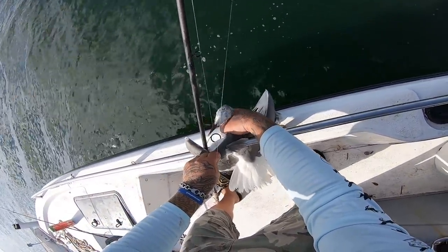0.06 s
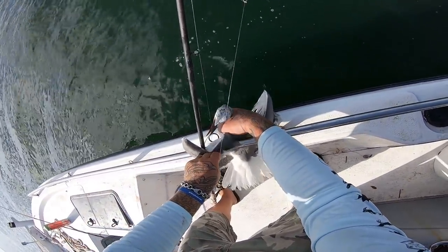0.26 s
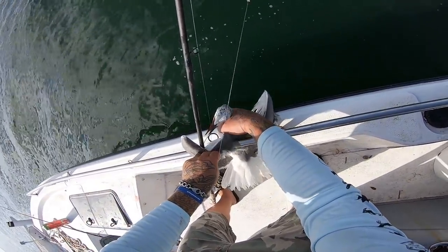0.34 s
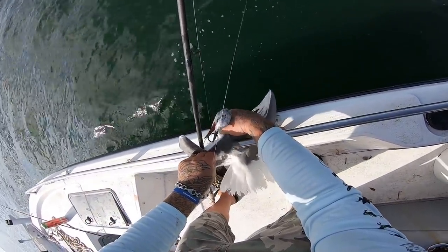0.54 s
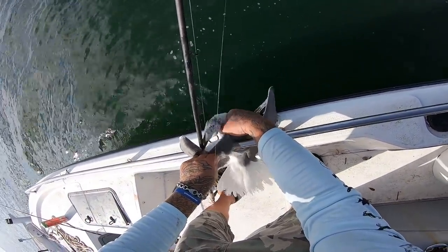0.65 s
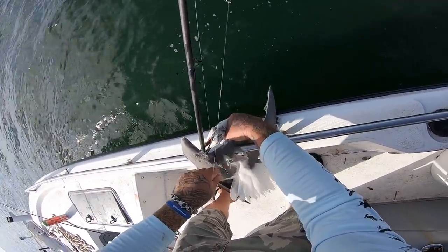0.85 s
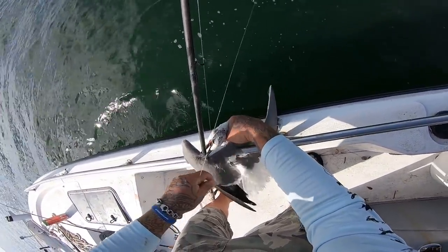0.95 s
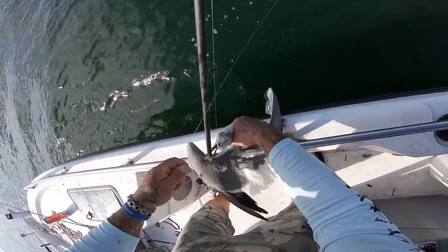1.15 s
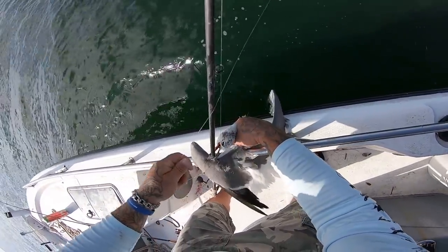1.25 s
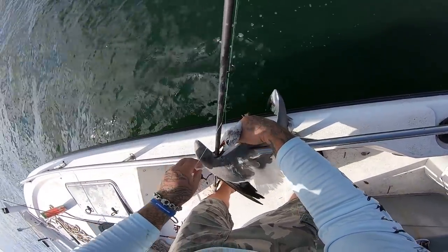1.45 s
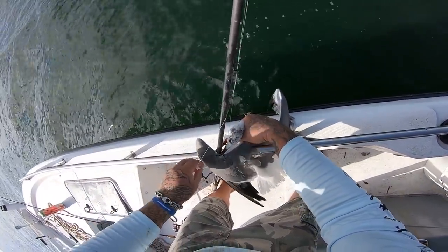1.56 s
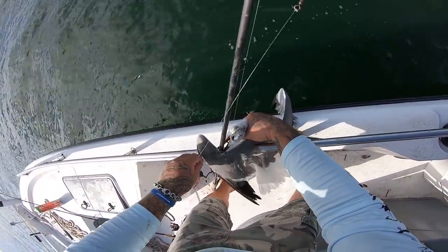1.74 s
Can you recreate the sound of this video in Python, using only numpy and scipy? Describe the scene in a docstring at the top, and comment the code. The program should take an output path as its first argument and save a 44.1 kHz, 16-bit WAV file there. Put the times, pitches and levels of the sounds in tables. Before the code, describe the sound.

A gull held on a small boat gives a harsh, creaky distress cry close to the microphone, over dull bumps. A small knock and rustle follow, then a second rough cry, with a faint low hum underneath.

```python
"""A low hum and background noise sound throughout, beside a gull held on a small boat's deck.
After a tick of handling, the gull gives a harsh distress cry at 0.2 s, close by, over dull bumps.
Pulses of its syrinx ring the throat: the cry creaks, arches in pitch, catches and ends in a creak.
A small knock and a rustle follow near 0.8 s, then at 1 s a second such cry, partly period-doubled.
The boat rings faintly after each cry; a drip and a faint tick come last."""
import sys
import numpy as np
from scipy import signal
from scipy.fft import rfft, irfft, next_fast_len
from scipy.io import wavfile
from scipy.ndimage import uniform_filter1d

SR = 44100
rng = np.random.default_rng(int(sys.argv[2]) if len(sys.argv) > 2 else 0)


def pcm_store(signal):
    """Save signal as 16-bit PCM."""
    levels = np.round(np.clip(np.atleast_2d(signal), -1, 1) * 32767)
    wavfile.write(sys.argv[1], SR, levels.astype(np.int16).T)


N = 79380
T = np.arange(N) / SR
SIZE = next_fast_len(2 * N)
FREQS = np.maximum(np.arange(SIZE // 2 + 1) * SR / SIZE, 1)

# Spectra of the background noise and of handling. Each row: frequency in Hz, relative level in dB.
NOISE_SPECTRUM = [(25, -13.5), (60, 13.5), (220, -4.5), (380, 1.5), (800, -12), (1300, -11.5), (2200, -16),
                  (8500, -23.5), (10500, -41)]
RUSTLE_SPECTRUM = [(300, -7.5), (3000, -1.5), (6000, -3.5), (11500, -28)]
# Level of the background noise. Each row: time in seconds, low body in dB, hiss in dB.
NOISE_LEVELS = [(0, -56.5, -62), (.3, -53.5, -52.5), (.7, -54.5, -58), (.86, -52.5, -62.5),
                (.92, -62.5, -72), (.975, -51, -73.5), (1.1, -53, -50), (1.63, -54, -60),
                (1.71, -60, -70.5)]
# Rustles and ticks. Each row: time of the peak in seconds, level there in dB.
RUSTLES = [(.158, -45.5), (0.779, -41.5), (0.792, -36.5)]
# Pitch arch of each cry. Each row: time in seconds, pitch in Hz.
ARCH_1 = [(.199, 426), (.207, 692), (.212, 894), (.228, 998.7), (.29, 1043), (.36, 1033), (.425, 1019),
          (.56, 968.6), (.582, 878), (.598, 751.4), (.615, 526)]
ARCH_2 = [(.983, 770), (1.0, 845), (1.015, 912), (1.04, 953), (1.135, 972), (1.3, 948), (1.385, 920),
          (1.444, 845), (1.448, 560), (1.458, 530)]
# Vocal effort, catches aside. Each row: time in seconds, level in dB, relative treble gain in dB.
EFFORT_1 = [(.2, -17, -10.5), (0.211, -18.5, -18.5), (0.226, -15, -1), (0.292, -15.5, 2.5),
            (0.441, -15.5, 0), (0.557, -15.5, -6), (0.584, -23, -14), (.603, -23, -17.5), (.616, -28, -16)]
EFFORT_2 = [(.983, -21.5, -39.5), (1.003, -18.5, 0.5), (1.061, -18, 5.5), (1.171, -18, 13), (1.382, -19, 7),
            (1.435, -21, -1), (1.458, -24.5, -7.5), (1.462, -31, -46)]
# Irregularity of the syrinx. Each row: time in seconds, roughness and period doubling from 0 to 1.
GRAIN_1 = [(.209, .45, .3), (.215, .025, .03), (.235, .003, .02), (.58, .002, .002), (.587, .25, .1),
           (.615, .3, .15)]
GRAIN_2 = [(1.0, .13, .3), (1.018, .015, .07), (1.034, .04, .3), (1.104, .015, .13), (1.11, .25, .45),
           (1.117, .01, .12), (1.155, .005, .04), (1.167, .035, .1), (1.18, .001, .02), (1.444, .002, .006),
           (1.45, .14, .1)]
# Catches of the voice. Each row: start in seconds, end in seconds, depth from 0 to 1.
CATCHES = [(0.258, 0.276, .35), (0.32, 0.344, .45), (.378, 0.41, .55), (0.442, 0.478, .8), (0.5, 0.534, 1),
           (1.102, 1.11, 0.6), (1.225, 1.226, 0.4), (1.274, 1.284, 0.6), (1.34, 1.351, 1),
           (1.397, 1.406, 0.9)]
# Resonances of throat and beak. Each row: frequency in Hz, relative gain in dB.
THROAT_1 = [(300, -13.5), (1000, -16), (1750, -2.5), (2900, -3.5), (3950, 3.5), (4500, -10), (5150, -5.5),
            (5900, -18.5), (7200, -22), (8100, -33), (9300, -26.5), (11000, -52.5), (15000, -61)]
THROAT_2 = [(300, -33.5), (540, -34), (1300, 14), (1700, 11.5), (2800, 7.5), (3850, -3.5), (4800, -0.5),
            (5800, -9), (6700, -16.5), (7700, -17), (9700, -43.5), (11000, -51.5), (15000, -78.5)]
# Stereo image of each cry. Each row: frequency in Hz, left over right in dB, left lead in radians.
IMAGE_1 = [(1080, 0, 0.93), (1975, -0.5, -2), (2940, 2, 0.47), (4050, -2.5, 1), (5200, 2, 0.5),
           (6390, 2, 1)]
IMAGE_2 = [(1030, 2.5, -0.94), (1870, 1, 1.72), (2550, -6.5, 0.14), (3794, 0, 0.61), (4970, -0.5, -0.84),
           (6200, -8.5, -1.2)]
# Dull bumps. Each row: time of the peak in seconds, frequency in Hz, peak in dB.
BUMPS = [(.27, 78.7, -22), (0.302, 76.2, -21), (0.416, 91.6, -26.5), (0.544, 60.8, -19.5),
         (1.279, 92.6, -30.5)]
# Small knocks, ticks and drips. Each row: time of the peak in seconds, frequency in Hz, peak in dB.
SMALL_IMPACTS = [(.77, 327, -36), (.806, 676, -43.5), (1.165, 335, -34), (1.668, 1232, -39.5),
                 (1.73, 1970, -51)]


def from_db(db):
    """Amplitude grows tenfold every 20 dB."""
    return 10 ** (np.asarray(db) / 20)


def rms_one(x):
    """Normalisation to unit mean power."""
    return x / np.sqrt(np.mean(x ** 2) + 1e-20)


def in_time(rows):
    """Linear interpolation of each column in time."""
    s, *columns = np.transpose(rows)
    return [np.interp(T, np.sort(s), c) for c in columns]


def in_frequency(rows):
    """Interpolation of each column in log frequency."""
    hz, *columns = np.transpose(rows)
    return [np.interp(np.log(FREQS), np.log(hz), c) for c in columns]


def filtered(x, response):
    """Convolution as a product of spectra."""
    return irfft(rfft(x, SIZE) * response, SIZE)[..., :N]


def colour(x, spectrum):
    """Folding the cepstrum gives a causal, minimum-phase filter."""
    cepstrum = irfft(np.log(from_db(in_frequency(spectrum)[0])), SIZE)
    cepstrum[1:SIZE // 2] *= 2
    cepstrum[SIZE // 2 + 1:] = 0
    return filtered(x, np.exp(rfft(cepstrum)))


def split(x, hz, order):
    """Complementary filters part the lows from the highs."""
    low = filtered(x, 1 / (1 + (FREQS / hz) ** order))
    return low, x - low


def smooth(x):
    """A moving average over several voice cycles."""
    return uniform_filter1d(uniform_filter1d(x, size=300), size=220)


def drift(hz):
    """Low-passed noise fluctuates slowly, with unit RMS."""
    return rms_one(filtered(rng.standard_normal(N), 1 / (1 + (FREQS / hz) ** 2) ** 2))


def swell(s, rise, decay):
    """A Gaussian rise to 1 at time s, then exponential decay."""
    return np.exp(-.5 * (np.minimum(T - s, 0) / rise) ** 2 - np.maximum(T - s, 0) / decay)


def stereo_noise(spectrum, side_db=-8):
    """A weak side signal leaves the two channels largely coherent."""
    mid, side = rng.standard_normal((2, N))
    return rms_one(colour(mid + from_db(side_db) * side * [[1], [-1]], spectrum))


def hum(hz=90.5, level_db=-50.5, waver_db=1.2):
    """A low sinusoid under slight random amplitude modulation."""
    return np.sqrt(2) * from_db(level_db + waver_db * drift(17)) * np.sin(2 * np.pi * hz * T)


def background_noise():
    """Broadband noise whose low body and hiss rise and drop in level."""
    body, hiss = split(stereo_noise(NOISE_SPECTRUM), hz=1010, order=4)
    body_db, hiss_db = in_time(NOISE_LEVELS)
    return from_db(body_db) * rms_one(body) + from_db(hiss_db) * rms_one(hiss)


def handling():
    """Rustles and ticks are transients: bursts of noise that decay fast."""
    bursts = sum(from_db(db) * swell(s, rise=.0014, decay=.0052) for s, db in RUSTLES)
    return stereo_noise(RUSTLE_SPECTRUM) * bursts


def pulses(times, sizes, half_width=16):
    """Windowed sincs place band-limited impulses between samples."""
    train = np.zeros(N)
    at = (times * SR).astype(int)[:, None] + np.arange(-half_width, half_width + 1)
    offset = at - times[:, None] * SR
    window = np.cos(np.pi * offset / (2 * half_width + 2)) ** 2
    np.add.at(train, np.clip(at, 0, N - 1), sizes[:, None] * np.sinc(offset) * window)
    return train


def syrinx(pitch, grain, start, end, jitter_cycles=.15, shimmer_db=7, doubling_cycles=.024):
    """One pulse a cycle: jitter and shimmer make it creak, alternation doubles the period."""
    cycles = np.cumsum(pitch) / SR
    first, last = np.interp([start, end], T, cycles)
    times = np.interp(np.arange(first, last + .5), cycles, T)
    rough, doubling, hz = (np.interp(times, T, c) for c in (*in_time(grain), pitch))
    doubling *= from_db(3.5 * np.interp(times, T, drift(44)))
    alternate = (-1) ** np.arange(len(times))
    jitter, shimmer = rng.standard_normal((N // 100, 2))[:len(times)].T
    delays = (jitter_cycles * rough * jitter + doubling_cycles * doubling * alternate) / hz
    sizes = (1 + doubling * alternate / 2) * from_db(shimmer_db * rough * shimmer)
    sounding = (T > times[0]) & (T < times[-1] + 1 / hz[-1])
    return pulses(times + delays, sizes), sounding


def vocal_tract(train, throat, wander_db=1.6):
    """Throat and beak resonate; as they move, each band swells and fades a little."""
    rest = split(colour(train, throat), hz=200, order=6)[1]
    voice = 0
    for hz in (1450, 2450, 3450, 4400, 5400, 7300):
        band, rest = split(rest, hz, order=24)
        voice += band * from_db(wander_db * drift(22))
    return voice + rest


def levelled(voice, sounding):
    """Division by the running RMS evens out the level."""
    power = smooth(voice ** 2) / np.maximum(smooth(1. * sounding), 1e-3)
    power = np.interp(T, T[sounding], power[sounding])
    return voice / np.sqrt(power + 1e-12)


def placed(voice, image):
    """Level and phase differences between left and right locate a source."""
    balance_db, lead = in_frequency(image)
    left = from_db(balance_db / 2) * np.exp(.5j * lead)
    return filtered(voice, np.array([left, 1 / left]))


def cry(arch, effort, grain, throat):
    """Source and filter: the syrinx drives the throat. A catch lowers pitch, level and treble."""
    catch_in_s, catch_out_s = .0028, .005
    sag_hz, loss_db, dull_db = 53.65, 3.5, 6
    waver_hz, flutter_db = 1.5, .8
    catch = sum(depth * (np.tanh((T - start) / catch_in_s) - np.tanh((T - end) / catch_out_s)) / 2
                for start, end, depth in CATCHES)
    pitch = in_time(arch)[0] - sag_hz * catch + waver_hz * drift(60)
    level_db, treble_db = in_time(effort)
    train, sounding = syrinx(pitch, grain, start=arch[0][0], end=arch[-1][0])
    low, treble = split(vocal_tract(train, throat), hz=4000, order=8)
    voice = low + treble * from_db(treble_db - dull_db * catch)
    return levelled(voice, sounding) * from_db(level_db - loss_db * catch + flutter_db * drift(22))


def reflections(x, gain_db, t60_s, cutoff_hz):
    """Diffuse reverberation: dull echoes decay exponentially, different on each side."""
    scatter = split(rng.standard_normal((2, N)), cutoff_hz, order=2)[0]
    echoes = scatter * from_db(-60 * T / t60_s) * (T > .003)
    echoes /= np.sqrt(np.sum(echoes ** 2) / 2)   # unit energy per side
    return from_db(gain_db) * filtered(x, rfft(echoes, SIZE))


def damped_tones(rows, rise, decay):
    """Each event swells and dies as one damped sinusoid."""
    return sum(from_db(db) * swell(s, rise, decay) * np.sin(2 * np.pi * hz * (T - s))
               for s, hz, db in rows)


def bumps(rumble_db=-17):
    """A heavily damped low tone with a little rumble is heard as a dull knock."""
    rumble = rms_one(split(rng.standard_normal(N), hz=218, order=6)[0])
    envelope = sum(from_db(db) * swell(s, rise=.023, decay=.043) for s, _, db in BUMPS)
    return damped_tones(BUMPS, rise=.0082, decay=.022) + from_db(rumble_db) * rumble * envelope


def small_impacts():
    """Small knocks, ticks and drips are brief damped oscillations."""
    return damped_tones(SMALL_IMPACTS, rise=.0011, decay=.0058)


def scene():
    """Superposition of the gull, its reflections and the sounds around it."""
    gull = placed(cry(ARCH_1, EFFORT_1, GRAIN_1, THROAT_1), IMAGE_1)
    gull += placed(cry(ARCH_2, EFFORT_2, GRAIN_2, THROAT_2), IMAGE_2)
    deck = reflections(gull, gain_db=-24, t60_s=.07, cutoff_hz=4000)
    boat_ring = reflections(gull, gain_db=-38, t60_s=.95, cutoff_hz=2036)
    around = bumps() + small_impacts() + handling() + hum() + background_noise()
    return gull + deck + boat_ring + around * from_db([[-.45], [.45]])   # slightly to the right


def record(dry, stopband_hz=16200):
    """A steep low-pass filter removes the highest treble."""
    return signal.sosfilt(signal.cheby2(14, 70, stopband_hz, fs=SR, output="sos"), dry)


dry = scene()
out = record(dry)
pcm_store(out)
```